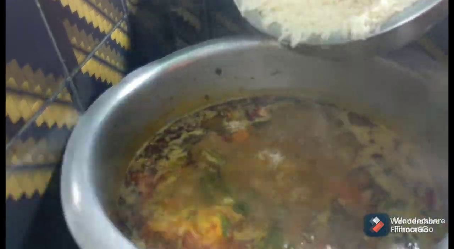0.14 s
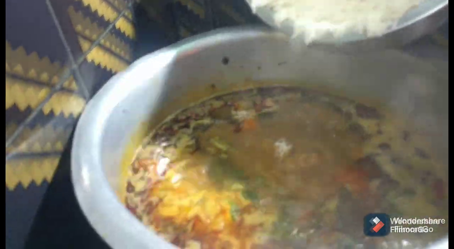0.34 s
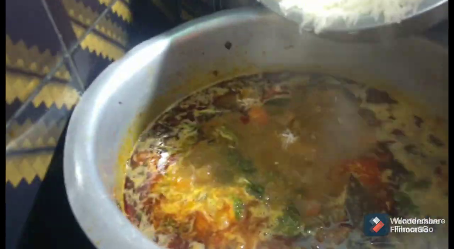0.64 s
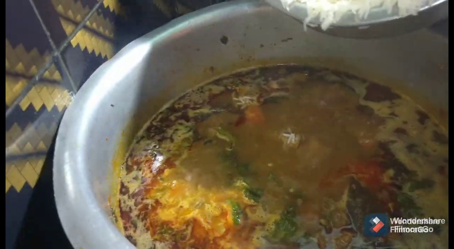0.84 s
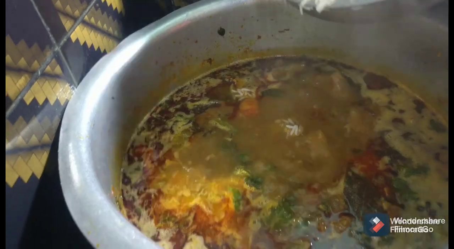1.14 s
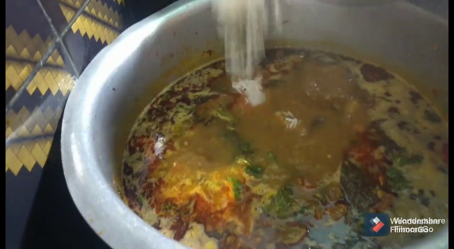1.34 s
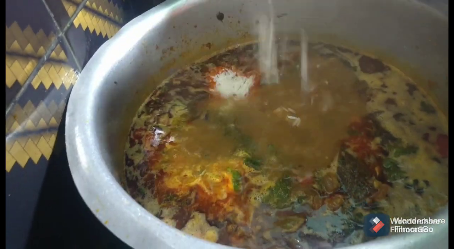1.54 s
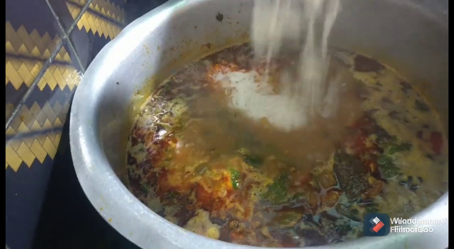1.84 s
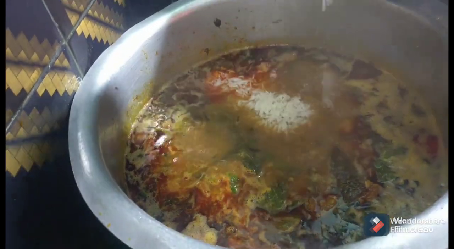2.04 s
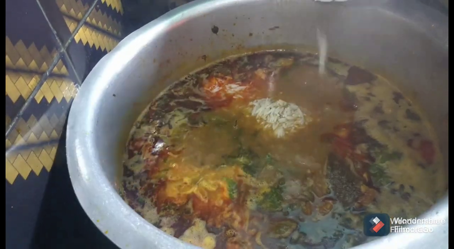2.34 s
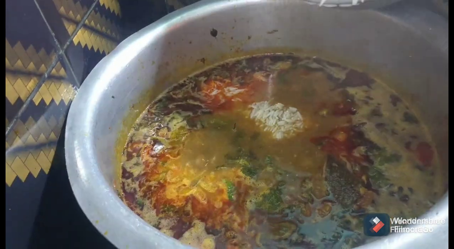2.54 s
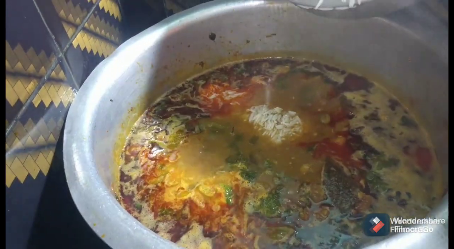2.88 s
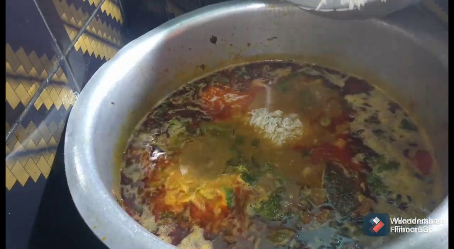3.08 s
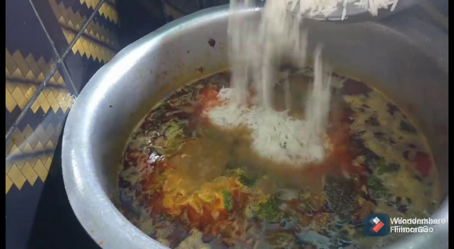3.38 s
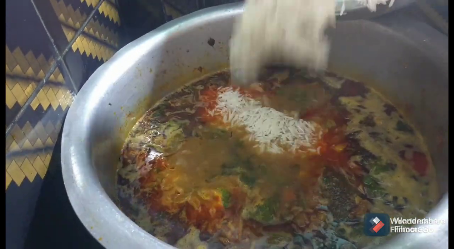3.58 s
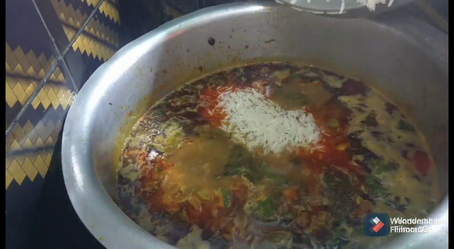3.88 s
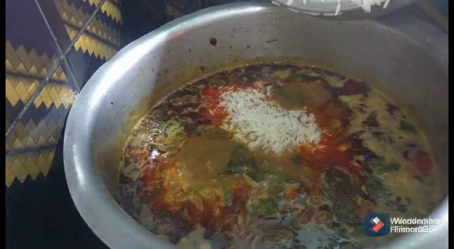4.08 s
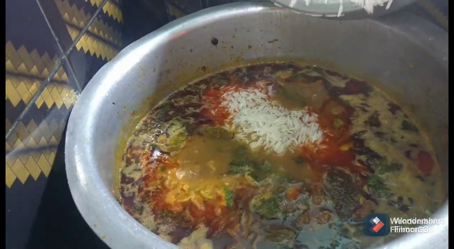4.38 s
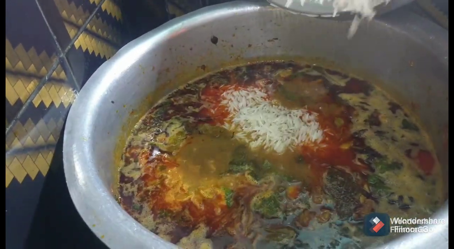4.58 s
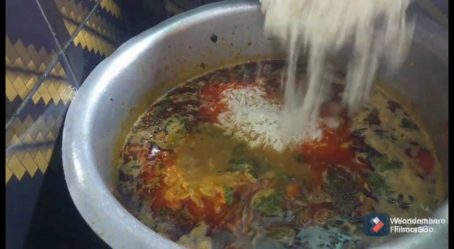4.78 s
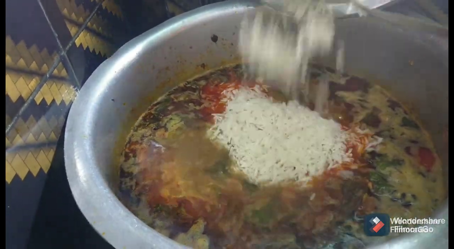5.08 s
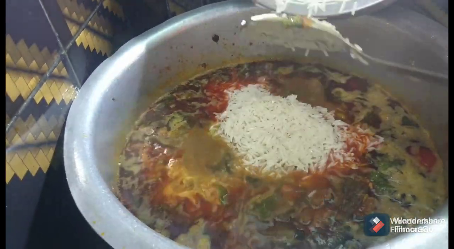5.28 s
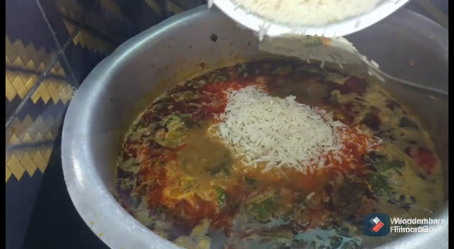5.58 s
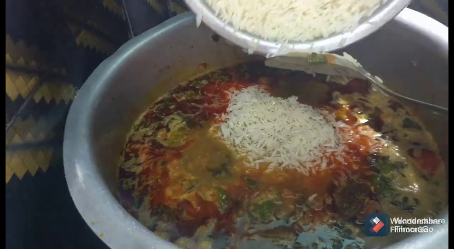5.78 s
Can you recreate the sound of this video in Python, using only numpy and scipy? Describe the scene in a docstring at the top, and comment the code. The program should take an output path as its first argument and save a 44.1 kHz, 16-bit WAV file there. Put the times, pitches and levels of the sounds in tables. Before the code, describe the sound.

A steel bowl knocks and clinks on a metal pot rim as wet rice splashes in clumps into simmering gravy over a low kitchen hum.

```python
"""In a humming kitchen with a short tail, a steel bowl of wet rice knocks on a pot rim over simmering gravy.
The bowl is a bank of damped modes with a short crack; a spoon scrapes it once, its slips ringing steel modes.
Rice pours in as clumped random splashes and patter, with single grains and drops as short spits of noise.
Motor lines, tiny bubbles and patchy broad noise lie underneath.
One microphone port is open; the other is covered: dull, late and hissing."""
import sys
import numpy as np
from scipy import signal
from scipy.fft import rfft, irfft, next_fast_len
from scipy.io import wavfile
from scipy.ndimage import uniform_filter1d

SR = 44100
rng = np.random.default_rng(int(sys.argv[2]) if len(sys.argv) > 2 else 0)


def inscribe(sig):
    """Save sig as 16-bit PCM at rate SR to the path in sys.argv[1].

    A 1-D sig is mono; a 2-D sig holds one channel per row.
    Samples are clipped to [-1, 1] before scaling.
    """
    pcm = np.round(np.clip(np.atleast_2d(sig).T, -1, 1) * 32767)
    wavfile.write(sys.argv[1], SR, pcm.astype(np.int16))


N = 261072

# centres of the bowl's regions, in order boom, thump, body, wall, rim, lip, edge: centre_hz
REGION_CENTRES_HZ = [110, 240, 600, 1400, 2300, 3800, 8000]


def gain_of(db):
    """Amplitude factor of a level in dB."""
    return 10 ** (np.asarray(db) / 20)


def evened(x):
    """Scales a signal to an rms of 1."""
    return x / np.sqrt(np.mean(x ** 2) + 1e-20)


def read(points, hz):
    """Interpolates a curve of (Hz, value) along log frequency."""
    point_hz, value = np.transpose(points)
    return np.interp(np.log(hz + 1), np.log(point_hz + 1), value)


def add(mix, start_s, sound):
    """Lays a sound into the mix in place, cut at the end."""
    part = mix[round(start_s * SR):][:len(sound)]
    part += sound[:len(part)]


def colour(x, points, lag_s=0):
    """Filters by a spectrum in dB, with an optional delay."""
    size = next_fast_len(len(x) + 4096)
    hz = np.fft.rfftfreq(size, 1 / SR)
    delay = np.exp(-2j * np.pi * hz * lag_s)
    return irfft(rfft(x, size) * gain_of(read(points, hz)) * delay, size)[:len(x)]


def resonate(x, hz, width_hz):
    """Two-pole resonance of gain 1 at its centre."""
    return signal.lfilter(*signal.iirpeak(hz, hz / width_hz, SR), x)


def gravel(count, per_s, spread_db):
    """Random clicks of either sign and uneven size, at most 4 spreads above the smallest."""
    size = gain_of(spread_db * np.minimum(rng.exponential(1, count), 4))
    sign = rng.choice([-1., 1.], count)
    return size * sign * (rng.random(count) < per_s / SR)


def background():
    """Patchy broad noise, random in time and frequency, that swells with the simmer."""
    # simmer and kitchen: time_s, level_db
    rumble = [(0.0, -46.5), (0.49, -48), (1.48, -46.5), (2.238, -50), (2.93, -47.5), (4.25, -49),
              (4.6, -47), (5.01, -50), (5.92, -48.5)]
    # spectrum of the air: hz, relative level_db per Hz
    air_spectrum = [(20, -36), (37, -12), (55, 2), (80, 2), (125, -10.5), (210, -10), (300, -19.5),
                    (415, -27), (1050, -31.5), (2960, -37), (6000, -40.5), (9000, -45), (16400, -48.5)]
    frames = N // 256 + 5
    real, imaginary, patches = rng.standard_normal((frames, 513, 3)).T
    patches = uniform_filter1d(patches, 10, 0)  # smooth over frequency, then time
    patches = evened(uniform_filter1d(patches, 8, 1))
    cells = (real + 1j * imaginary) * gain_of(2.67 * patches)
    air = signal.istft(cells, nperseg=1024, noverlap=768)[1][:N]
    time_s, level_db = np.transpose(rumble)
    swell = gain_of(np.interp(np.arange(N) / SR, time_s, level_db))
    return swell * evened(colour(air, air_spectrum))


def hum():
    """Motor lines, each a steady tone in a narrow haze of twice-resonated noise."""
    # motor lines: centre_hz, width_hz of each haze pass, level_db before the tone and haze shares
    motor_lines = [(100.7, 18, -52), (148, 5.6, -53), (198.6, 20, -63), (299, 15, -72)]
    out = np.zeros(N)
    steady = .65  # share of the tone; the haze has the rest
    for hz, width_hz, level_db in motor_lines:
        tone = np.sqrt(2) * np.sin(2 * np.pi * (hz * np.arange(N) / SR + rng.random()))
        haze = resonate(rng.standard_normal(N), hz, width_hz)
        haze = evened(resonate(haze, hz, width_hz))
        out += gain_of(level_db) * (steady * tone + (1 - steady) * haze)
    return out


def simmer():
    """Tiny bubbles burst at the surface, each a faint short ring."""
    t = np.arange(200) / SR
    bubbles = np.zeros(N)
    for hz in np.geomspace(900, 7500, num=12):
        pop = np.sin(2 * np.pi * hz * t) * t * np.exp(-t * hz / 6.8) * hz
        bubbles += signal.oaconvolve(gravel(N, per_s=6., spread_db=3.), pop)[:N]
    return gain_of(-76) * evened(bubbles)


def pour(thickest_s, level_db, swell_s, thin_s, treble_db, slap_db):
    """Clumps of grains: wet splashes of many sizes in the low kilohertz, dry patter above, a dull slap below."""
    # spectrum laid over the wet drops: hz, relative level_db per Hz
    splash_spectrum = [(1120, -98), (1900, -13), (2390, 7), (2630, 0.5), (3620, 3), (3910, -1), (4940, 2),
                       (8000, -2), (10400, -97), (17600, -120)]
    fade_db = 20.  # lost over one swell or thin-out time
    patter_sag_db_per_s = 69  # later grains land wetter
    lead_s = min(thickest_s, .2)
    t = np.arange(-lead_s, .25, 1 / SR)
    envelope_db = level_db - fade_db * np.maximum(-t / swell_s, t / thin_s)
    clumps = gain_of(3.0 * evened(uniform_filter1d(rng.standard_normal(len(t)), 250)))
    drops = np.zeros(len(t))
    for hz in np.geomspace(1900, 7500, num=10):
        drops += resonate(gravel(len(t), per_s=200., spread_db=0.0), hz, 0.36 * hz)
    splash = evened(colour(clumps * drops, splash_spectrum))
    grains = clumps * gravel(len(t), per_s=1900.0, spread_db=1.0)
    patter = evened(colour(grains, [(4000, 4.5), (7000, 3), (11000, 8.0), (16000, -0.5)]))
    slap = evened(colour(grains, [(300, -12.5), (900, -16), (2000, -0.5), (2700, -16)]))
    patter_gain = gain_of(treble_db - patter_sag_db_per_s * np.maximum(t, 0))
    rice = splash + patter_gain * patter + gain_of(slap_db) * slap
    return thickest_s - lead_s, gain_of(envelope_db) * rice * signal.windows.tukey(len(t), .1)


def regions(spot, hard_db, boom_db, thump_db):
    """Neighbouring spots share the power of the blow; a harder contact tilts it to the treble."""
    # what a blow drives, one row each for base, wall and rim: body_db, wall_db, rim_db, lip_db, edge_db, room_db
    spots = [(1.5, -44, -8, -20.5, -28, -13.5), (-27, 0.5, -10, -11, -17.5, -8),
             (-26, -25.5, 1.5, -6.5, -9, -11)]
    share = np.maximum(1 - abs(np.clip(spot, 0, 2) - np.arange(len(spots))), 0)
    *upper_db, room_db = 10 * np.log10(share @ gain_of(spots) ** 2)
    tilt_db = hard_db * np.log2(np.array(REGION_CENTRES_HZ[2:]) / REGION_CENTRES_HZ[3])
    return [boom_db, thump_db, *(upper_db + tilt_db)], room_db


def knock(level_db, region_db):
    """The blow rings every mode by its region, inside a short crack of the many small modes between them."""
    # modes of the bowl, damped by rice and hand: nominal hz, relative level_db, t60_s
    bowl = [(110, 9, 0.059), (234, 13.5, 0.022), (306, -5, 0.066), (526, 20, 0.009), (706, 1.5, 0.039),
            (1254, 4.5, 0.016), (1488, 13, 0.0087), (1910, 12.5, 0.0098), (2500, 19, 0.008),
            (3062, 6, 0.027), (3800, 12, 0.0089), (4200, 12.5, 0.013), (5000, -20.5, 0.005),
            (5680, 5.5, 0.022), (6980, 16, 0.0076), (7550, 4, 0.013), (8250, -8, 0.018),
            (9600, -28, 0.0098), (9700, -10.5, 0.0065)]
    # the many small modes: hz, level_db
    small_modes = [(200, -45), (800, 6.5), (9000, -2.5), (16000, -11.5)]
    t = np.arange(round(.2 * SR)) / SR
    drive = list(zip(REGION_CENTRES_HZ, region_db))
    detune, phase = rng.standard_normal((2, len(bowl), 1))
    hz, mode_db, t60_s = (column[:, None] for column in np.transpose(bowl))
    mode_db = mode_db + read(drive, hz)
    hz = hz * (1 + detune / 150)  # the grip detunes each mode a little
    modes = gain_of(mode_db - 60 * t / t60_s) * np.sin(2 * np.pi * hz * t + 3 * phase)
    ring = modes.sum(0)
    contact = 1 - np.exp(-(t / .002) ** 2)  # the force builds over the first moments
    noise = colour(colour(rng.standard_normal(len(t)), drive), small_modes)
    crack = contact * np.exp(-t / 0.004) * noise
    impulse = 1. * (np.arange(len(t)) == 200)
    spread = colour(colour(impulse, drive), small_modes)  # all directions together: no gaps
    direct = contact * ring + gain_of(11.0) * crack
    direct = direct + 0.16 * np.roll(direct, round(.0034 * SR))  # the bowl chatters once on the rim
    to_room = 0.6 * contact * ring + gain_of(25) * spread
    return gain_of(level_db) * np.array([direct, to_room])


def tick(peak_db, hz, dryness):
    """A few milliseconds of spit: broad when the grain is dry, a soft ring when it is a drop."""
    t, dryness = np.arange(500) / SR, np.clip(dryness, 0, 1)
    spit = rng.standard_normal(500) * np.exp(-t / 0.0047) * (1 - np.exp(-t / 0.00016))
    grain = colour(spit, [(1000, -31), (3000, -9.5), (15000, -14.5)])
    drop = 1.4 * resonate(spit, hz, 0.13 * hz)
    spit = dryness * grain + (1 - dryness) * drop
    return gain_of(peak_db) * spit / abs(spit).max()


def room(x):
    """Sparse random taps that die at a rate set by frequency, with two early wall echoes."""
    # decay of the kitchen: hz, t60_s
    kitchen = [(200, 0.44), (1300, 0.32), (3000, 0.37), (6000, 0.3), (12000, 0.44)]
    taps = np.zeros(SR)
    at = np.arange(300, SR - 20, 20) + rng.integers(0, 20, (SR - 301) // 20)
    taps[at] = rng.choice([-1., 1.], len(at))
    hz, t, cells = signal.stft(taps, SR, nperseg=256)
    decay = gain_of(-60 * t / read(kitchen, hz)[:, None])
    tail = signal.istft(cells * decay, SR, nperseg=256)[1]
    tail = tail / np.linalg.norm(tail)
    for echo_s, share in [(.009, 0.3), (.0135, 0.44)]:
        add(tail, echo_s, np.array([share]))
    return signal.fftconvolve(x, tail)[:N]


def scrape():
    """Dense slips of the spoon edge excite steel modes over a broad rasp; each mode catches and lets go."""
    # path of the spoon: time_s, level_db, slide from 0 at the rim to 1 down the wall
    path = [(4.442, -36.5, 0), (4.505, -37, 0), (4.585, -38.5, 0.74), (4.608, -37, 0.96),
            (4.644, -40, 0.97), (4.656, -54, 0.9), (4.69, -52.5, 1), (4.719, -73, 0.9)]
    # rubbed steel: centre_hz, width_hz, rim_db, wall_db
    steel = [(680, 68, -7.5, -43), (1000, 69, -14, -57), (1310, 22, -28, -17), (1372, 30, -45, 8.5),
             (1470, 48, -33, -11), (1745, 51, -18, -5), (1910, 38, -15, -1), (2170, 49, 7.5, 7.5),
             (2510, 62, -6, -27), (3020, 46, 3.5, -5), (3100, 63, -6.5, -12), (3720, 130, 4, -28),
             (4200, 110, -23, -19), (5550, 78, 1.5, -23), (7140, 200, -0.5, -11), (7600, 64, 4, -4.5),
             (8620, 380, -15, -11), (10300, 270, -5.5, -24)]
    time_s, level_db, slide = np.transpose(path)
    t = np.arange(time_s[0], time_s[-1], 1 / SR)
    slips = evened(gravel(len(t), per_s=1500., spread_db=1.5))
    slide = np.clip(np.interp(t, time_s, slide), 0, 1)
    ring = np.zeros(len(t))
    for hz, width_hz, rim_db, wall_db in steel:
        catch = evened(uniform_filter1d(rng.standard_normal(len(t)), 600))
        mode_db = rim_db + slide * (wall_db - rim_db) + 3.2 * catch
        ring += gain_of(mode_db) * evened(resonate(slips, hz, width_hz))
    rasp = evened(colour(slips, [(500, -89), (1200, 13.5), (6000, -1.5), (15000, -17)]))
    both = evened(evened(ring) + 0.6 * rasp)
    fade_in = np.minimum((t - time_s[0]) * 500, 1)  # 2 ms
    return time_s[0], gain_of(np.interp(t, time_s, level_db)) * both * fade_in


def scene():
    """Places bowl, spoon and rice close by, and sends a share of each to the kitchen walls."""
    # knocks of the loaded bowl: start_s, level_db, spot (0 base, 1 wall, 2 rim),
    # hardness_db per octave, boom_db, thump_db
    knocks = [(0.04, -48, 0.058, -0.5, -17, -2.5), (0.235, -48.5, 0.13, -3, -1, -3),
              (0.33, -47.5, 0.021, -5.5, 6, -25), (0.548, -50, 0.022, -3, 10, -16),
              (0.92, -24.5, 1, 0, -15, -26), (1.243, -53, 0.11, 3, -19, -17),
              (1.2918, -23, 0.043, 2.5, -10, -31), (1.398, -28.5, 1, -1, -14, -22),
              (1.855, -22.5, 2.01, 1, -27, -23), (2.501, -53.5, 0.33, 2.5, -2, 5.5),
              (2.646, -14.5, 1.33, 1, -21.5, -31.5), (2.761, -24.5, 1.026, -1.5, -18, -26),
              (3.012, -32, 0.031, 3, -8, -20), (3.198, -50.5, 0.036, 3, -1, 4.5),
              (3.656, -40, 0.017, -0.5, -4, -27), (3.748, -37.5, 0.47, -0.5, -2, 6.5),
              (3.929, -46, 0.033, 3.5, 1, -9.5), (4.015, -48.5, 0.036, 1.5, 2, 0),
              (5.247, -48.5, 0.053, -2, -1, -11), (5.614, -46.5, 0.018, -3.5, -6, -27)]
    # clumps of falling rice: thickest_s, level_db of the splash there, swell_s, thin_out_s,
    # treble_share_db, slap_share_db
    pours = [(0.05, -65, 0.2, 0.057, -10, 2), (0.499, -50.5, 0.049, 0.1, -4, -9),
             (1.53, -53, 0.027, 0.033, -9, -6), (1.585, -49.5, 0.024, .2, 1.5, -35),
             (1.935, -42, 0.057, .14, -5, -20), (2.0, -46.5, 0.13, 0.071, -21, 4.5),
             (2.059, -44.5, .03, 0.056, -9, -20), (2.14, -50, 0.058, 0.018, -12, -24),
             (2.635, -51, 0.069, 0.017, -7, -10), (3.46, -52, 0.0096, 0.11, 3.5, -37),
             (3.51, -43, 0.053, 0.047, -8, -48), (3.601, -50.5, 0.13, 0.077, -8, -30),
             (3.821, -52, 0.053, 0.11, -4.5, -32), (4.795, -58, 0.044, 0.035, -17, -10),
             (4.895, -61.5, 0.075, .04, -28, -24), (4.964, -56, 0.067, .06, -8, -11),
             (5.035, -51.5, 0.04, 0.033, -4, -16), (5.112, -43, 0.081, 0.051, -5, -33),
             (5.163, -56, 0.039, 0.14, -6.5, -20), (5.29, -60, 0.16, 0.13, -4.5, -22)]
    # the loudest single grains and drops: start_s, peak_db ahead of the ports, centre_hz, dryness 0-1
    ticks = [(0.087, -48.5, 5000, 0.3), (0.1805, -47.5, 2510, 0.7), (0.275, -45, 5630, 0.84),
             (0.409, -49.5, 3350, 0.3), (0.6724, -47, 2600, 0), (1.0311, -52, 5000, 0.3),
             (1.057, -47.5, 5930, 0.64), (1.46, -45, 4770, 0.63), (1.4945, -39.5, 2980, 0.98),
             (1.5777, -34.5, 4700, 0.8), (1.6256, -40, 3000, 0.5), (1.7484, -33.5, 3960, 0.88),
             (1.807, -37, 2500, 0.73), (1.84, -35, 2500, 0.87), (1.92, -24.5, 3690, 0.94),
             (2.0594, -31, 3880, 0.9), (2.1797, -44.5, 4330, 0.4), (2.8693, -47.5, 4330, 0.2),
             (2.8866, -48.5, 4290, 0.5), (3.105, -53, 6300, 0.2), (3.155, -53, 5970, 0.3),
             (3.268, -53.5, 6000, 0.4), (3.445, -44, 5610, 1), (3.5588, -38, 2400, 0.95),
             (3.7788, -39, 3700, 0.55), (3.8162, -37, 4200, 0.62), (4.8946, -46, 3020, 0.1),
             (5.018, -43, 5000, 0.9), (5.555, -52, 3680, 1), (5.8703, -54, 5800, 0.2)]
    # what the kitchen throws back: hz, level_db
    walls = [(200, 15), (1500, 3.5), (4000, 1.5), (10000, -1.5)]
    strays, stray_db, stray_spread_db = 60, -52, 10.  # fainter grains, any time: count, loudest, range below
    near, sent = np.zeros((2, N))
    rice = simmer()
    for row in pours:
        add(rice, *pour(*row))
    for start_s, level_db, *blow in knocks:
        region_db, room_db = regions(*blow)
        direct, to_room = knock(level_db, region_db)
        add(near, start_s, direct)
        add(sent, start_s, gain_of(room_db) * to_room)
    for start_s, *row in ticks:
        add(rice, start_s, tick(*row))
    for when, size, pitch, dryness in rng.random((strays, 4)):
        stray = tick(stray_db - stray_spread_db * size, 2500 + 4000 * pitch, .5 * dryness)
        add(rice, when * N / SR, stray)
    start_s, scraped = scrape()
    add(near, start_s, scraped)
    add(sent, start_s, gain_of(-11.5) * scraped)
    sent = colour(sent + gain_of(-14.5) * rice, walls)
    answer = np.array([room(sent), room(sent)])  # each port hears other walls
    return near + rice + background() + hum() + answer


def record(dry):
    """The covered port hears everything late and the treble faintly, over its own noise; then the band limit."""
    # response of the open port: hz, level_db
    open_port = [(15, -42), (45, -13.5), (100, -1), (300, 0.5), (1000, 5), (5700, 5.5), (6300, 5),
                 (6900, 3.5), (16000, 3.5)]
    # response of the covered port: hz, level_db
    covered_port = [(15, -30), (45, -5.5), (200, -1), (500, -11), (1000, -17.5), (3000, -23.5), (7000, -35),
                    (16000, -37)]
    # spectrum of the covered port's own noise: hz, relative level_db per Hz
    self_noise = [(20, 5), (60, 31), (200, 17), (500, 5), (2000, -2.5), (7000, -12.5), (16000, -4.5)]
    covered_lag_s, self_noise_db, edge_hz = 0.00085, -63, 16100
    hiss = gain_of(self_noise_db) * evened(colour(rng.standard_normal(N), self_noise))
    covered = colour(dry[1], covered_port, covered_lag_s) + hiss
    ports = np.array([colour(dry[0], open_port), covered])
    band_limit = signal.firwin(511, edge_hz, window=("kaiser", 9), fs=SR)
    return signal.oaconvolve(ports, band_limit[None], "same")


dry = scene()
out = record(dry)
inscribe(out)
```